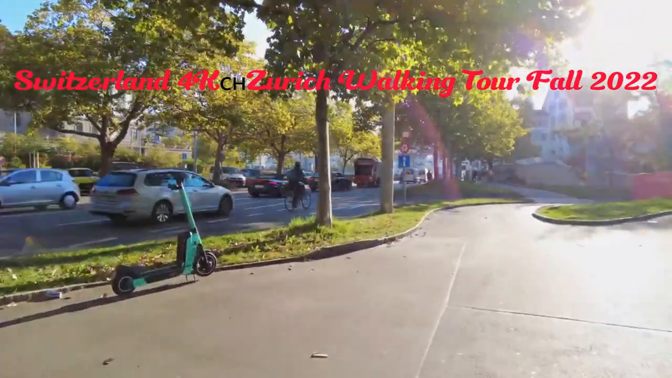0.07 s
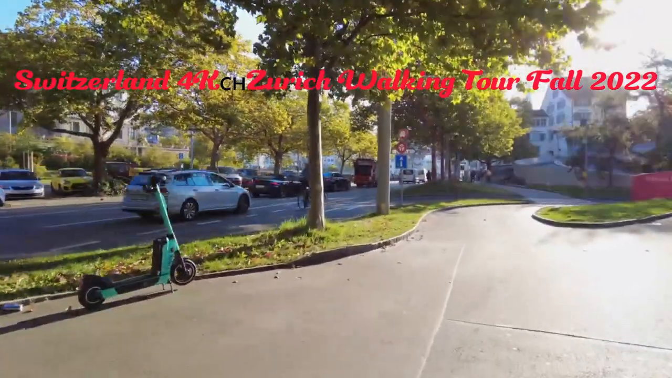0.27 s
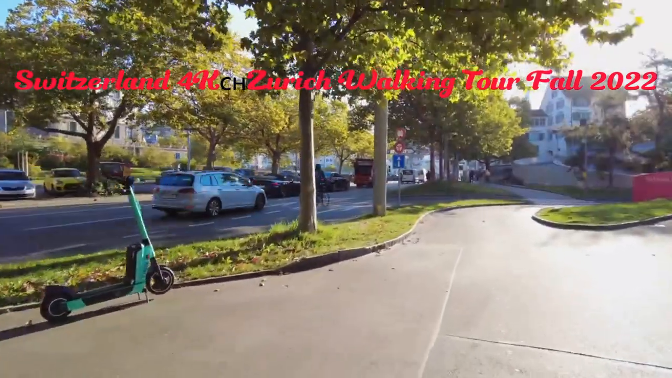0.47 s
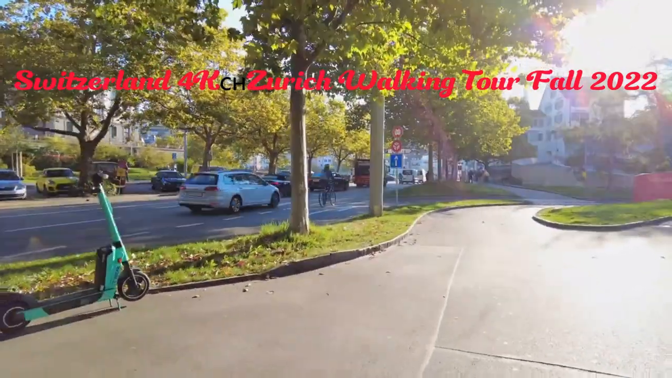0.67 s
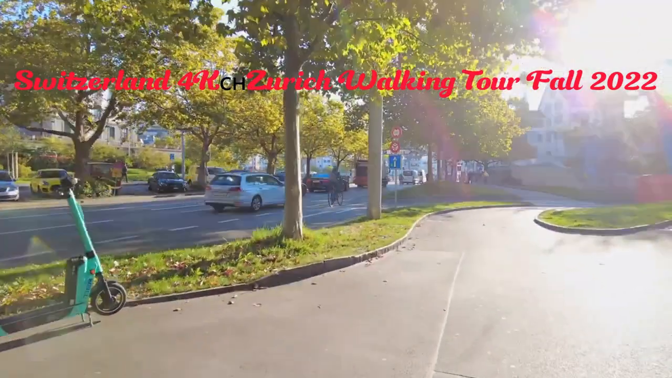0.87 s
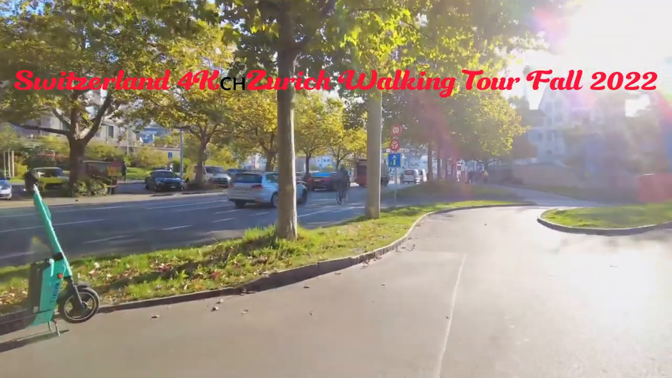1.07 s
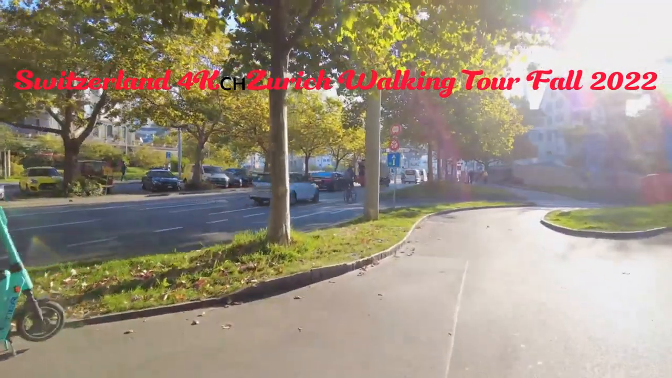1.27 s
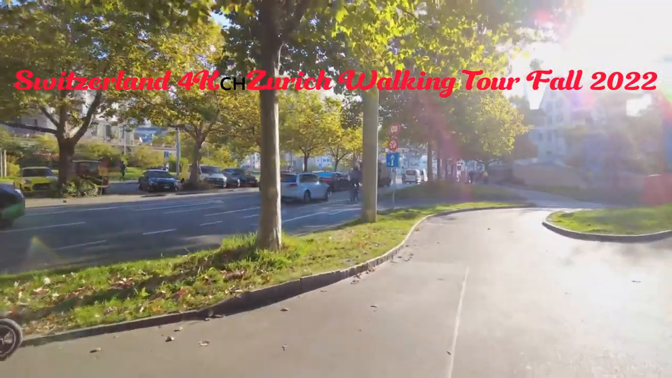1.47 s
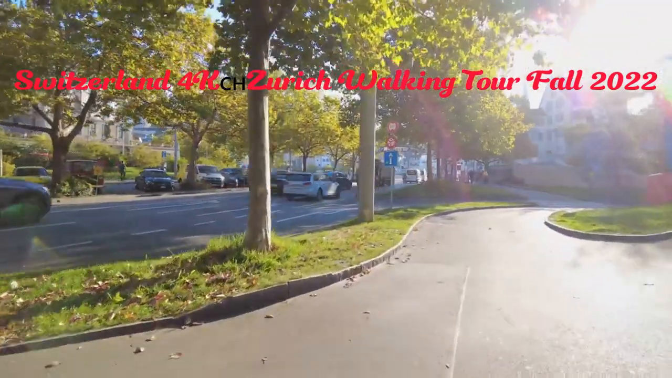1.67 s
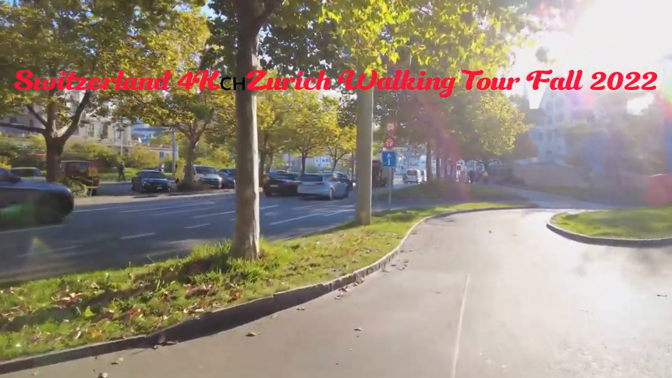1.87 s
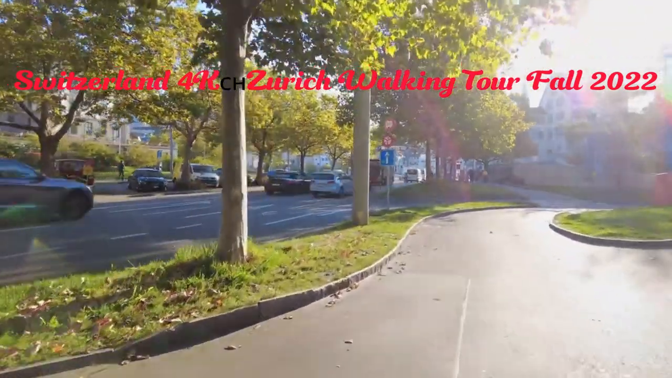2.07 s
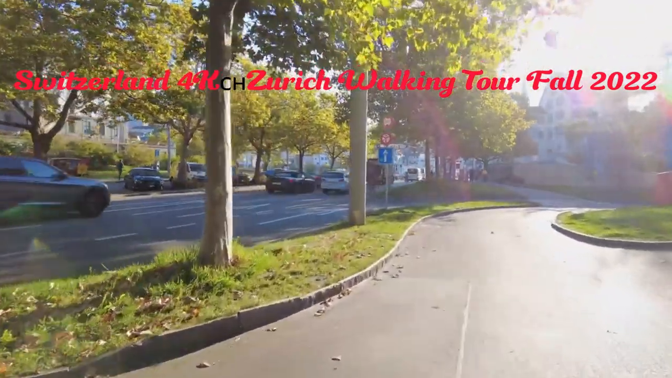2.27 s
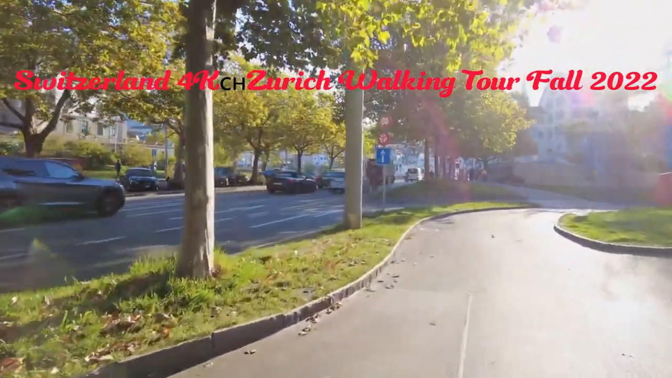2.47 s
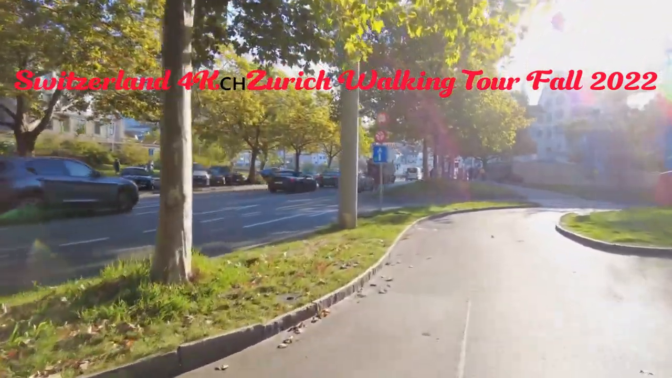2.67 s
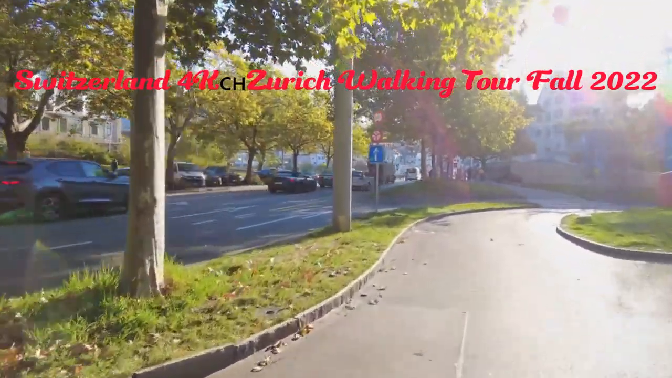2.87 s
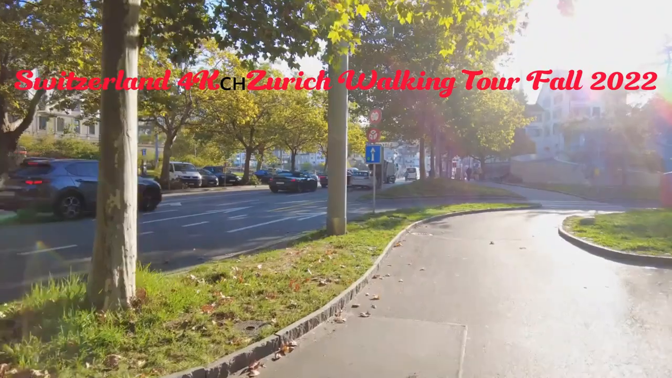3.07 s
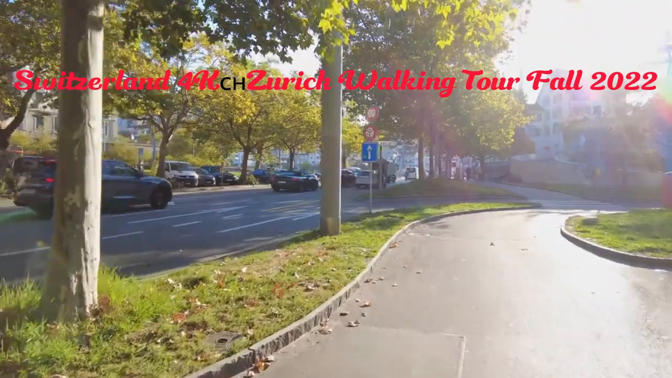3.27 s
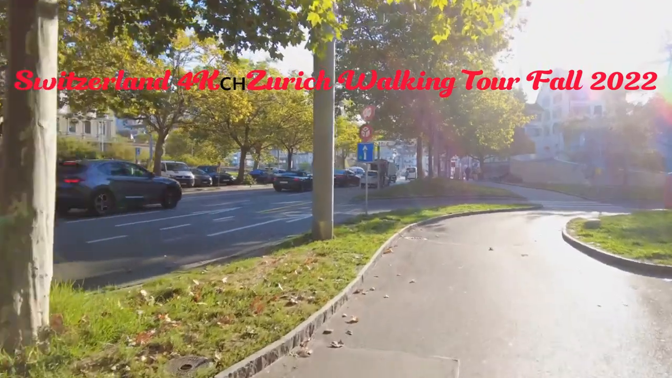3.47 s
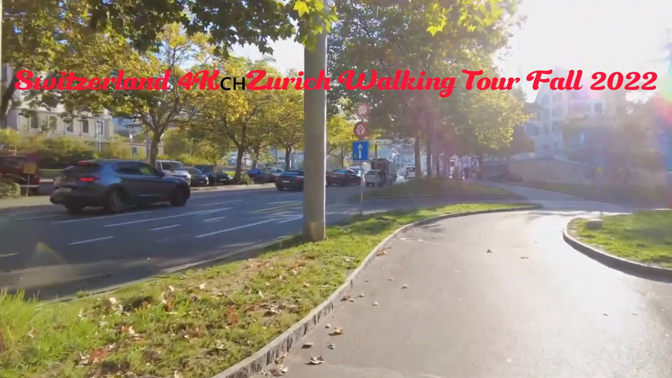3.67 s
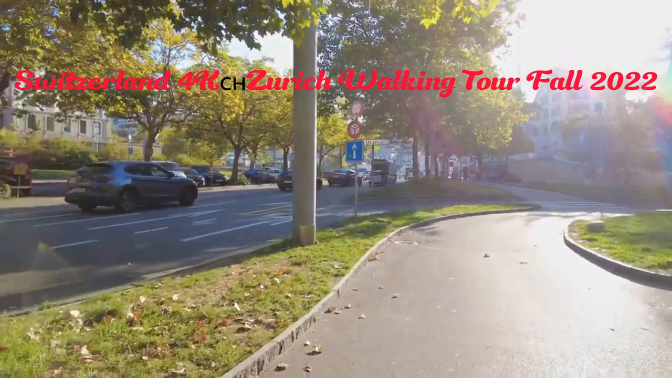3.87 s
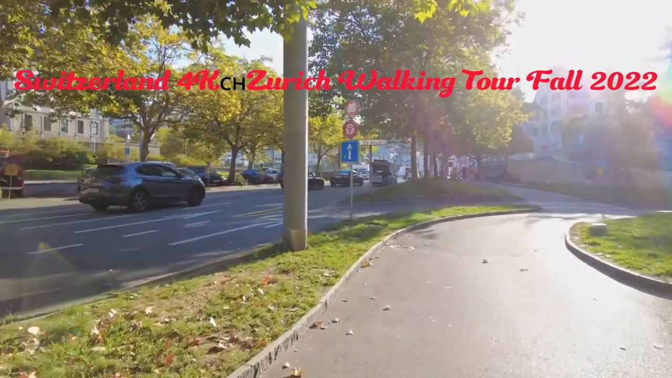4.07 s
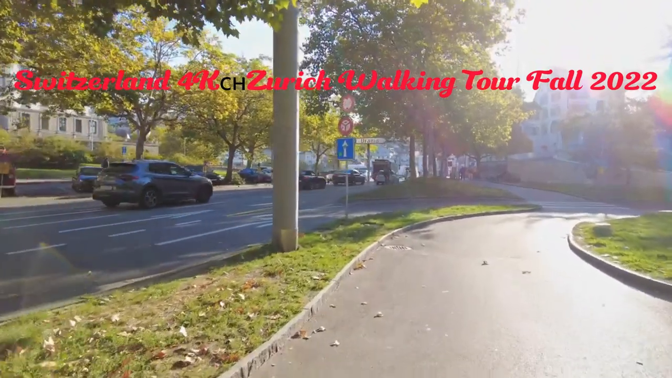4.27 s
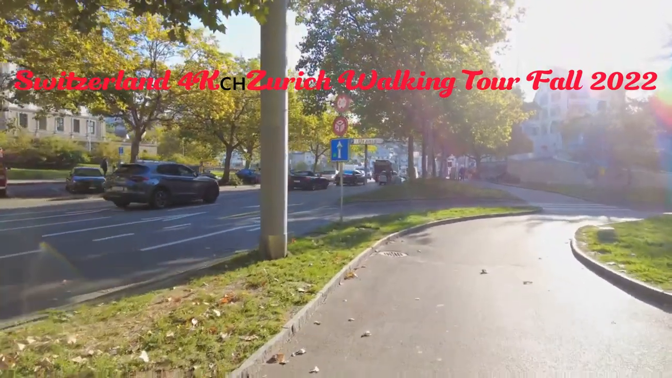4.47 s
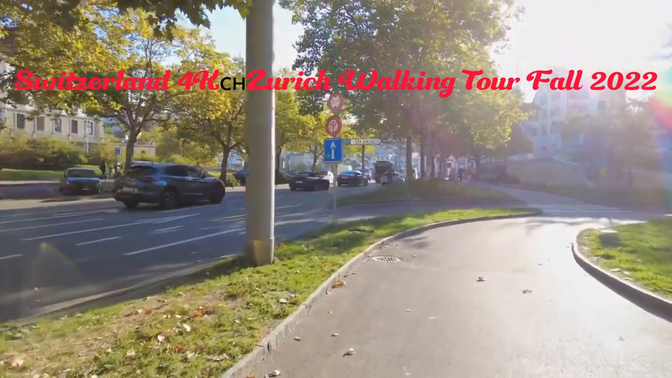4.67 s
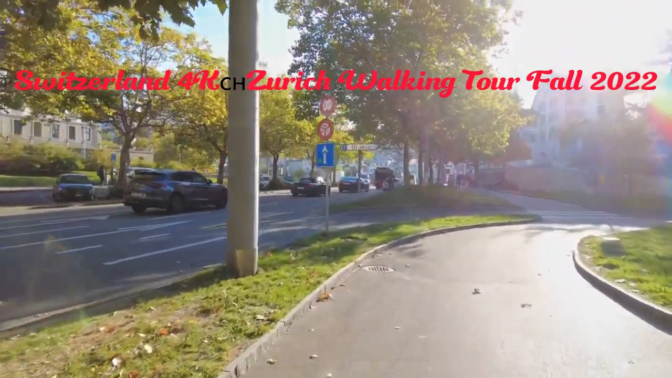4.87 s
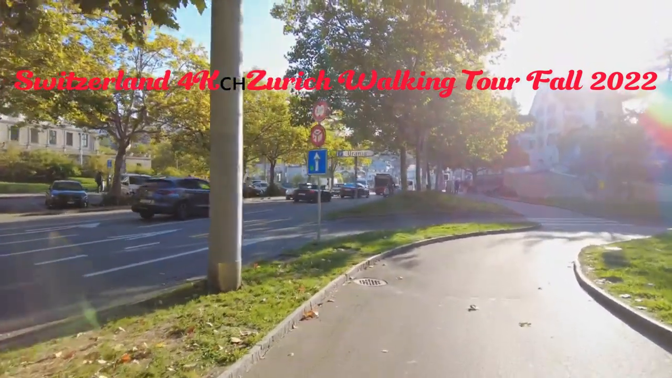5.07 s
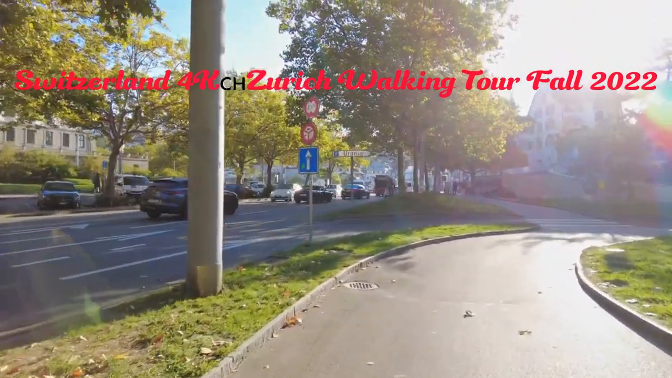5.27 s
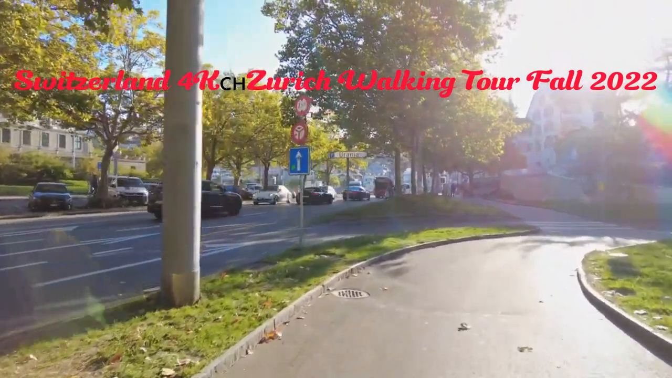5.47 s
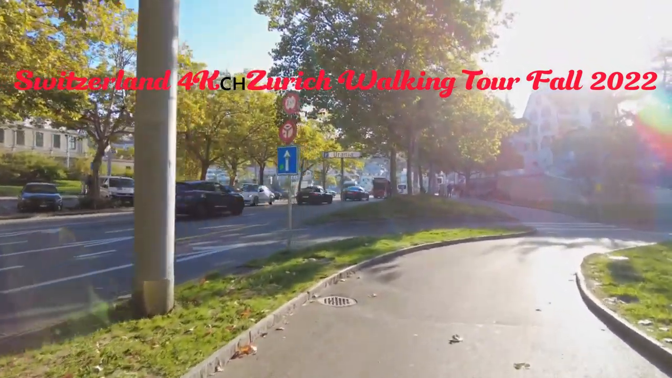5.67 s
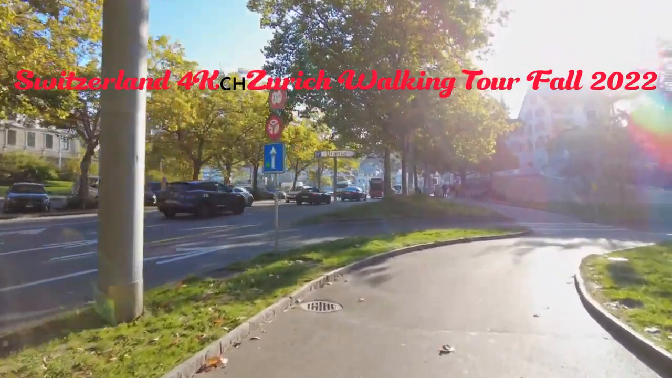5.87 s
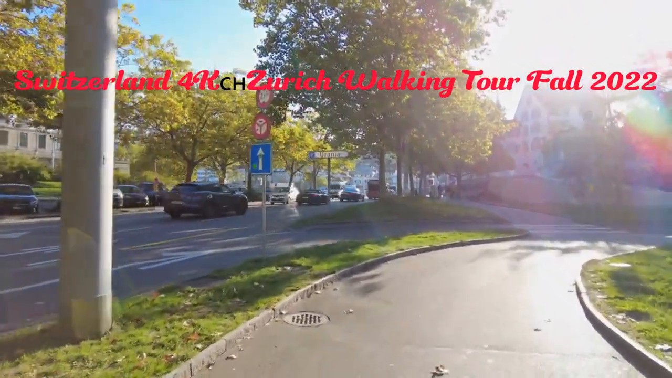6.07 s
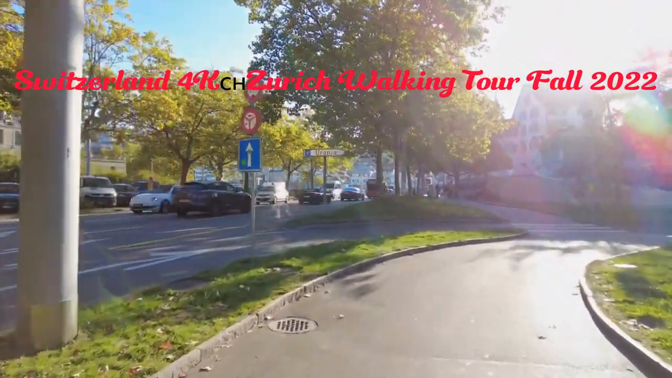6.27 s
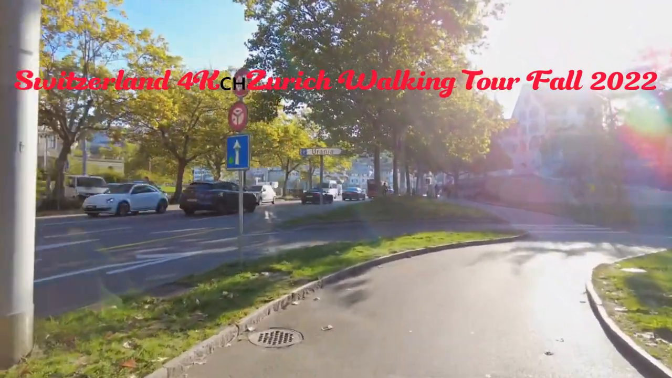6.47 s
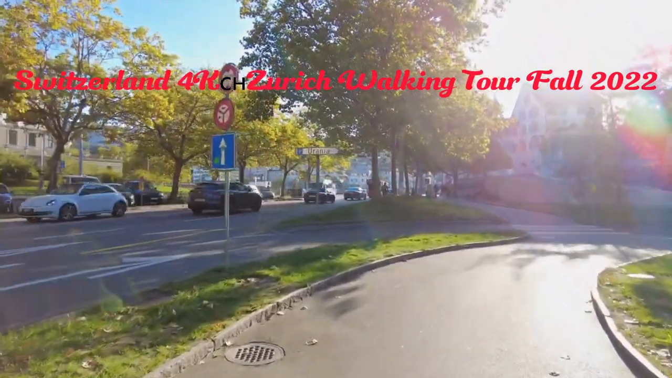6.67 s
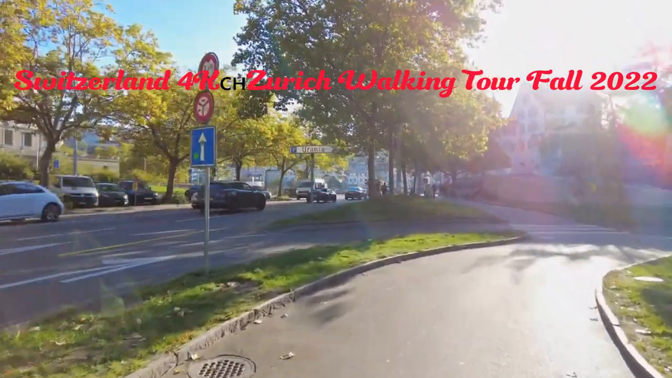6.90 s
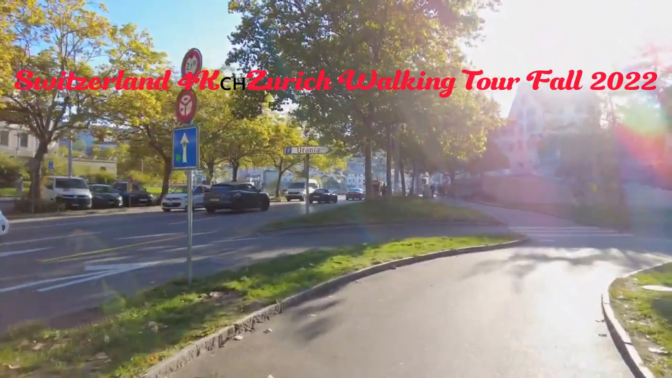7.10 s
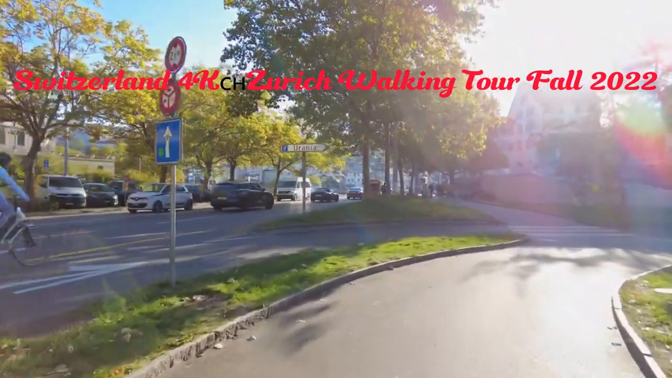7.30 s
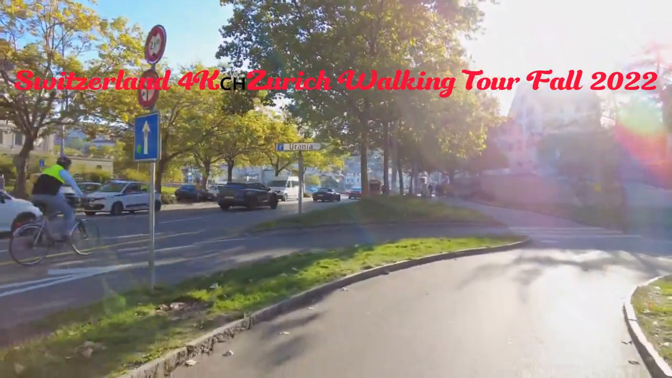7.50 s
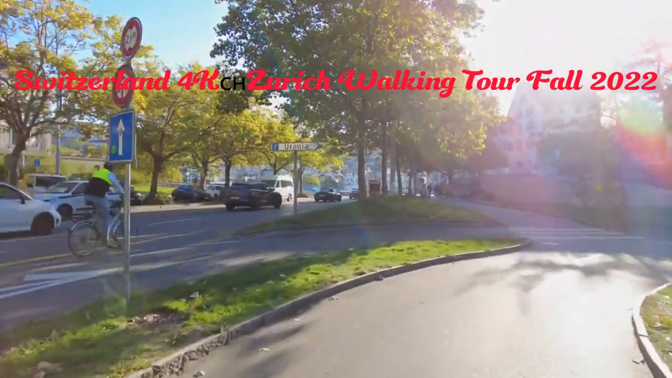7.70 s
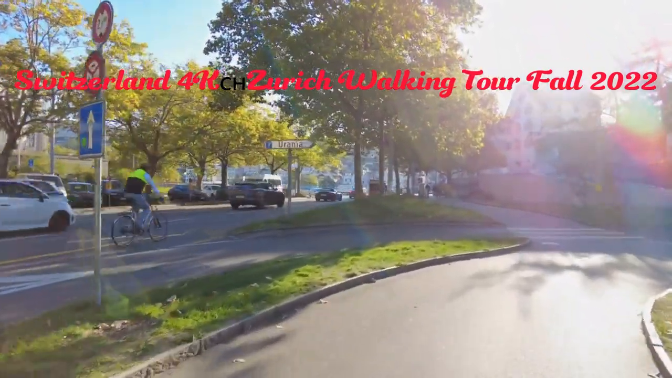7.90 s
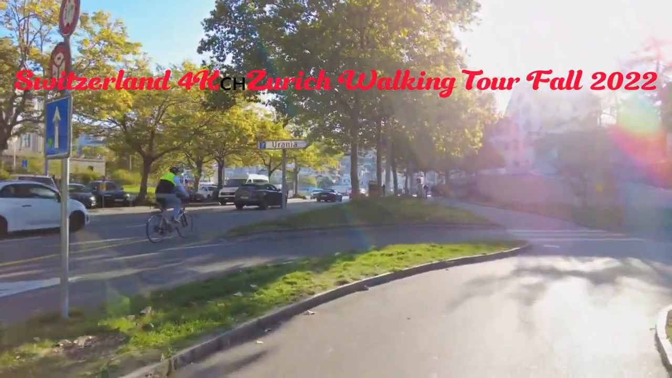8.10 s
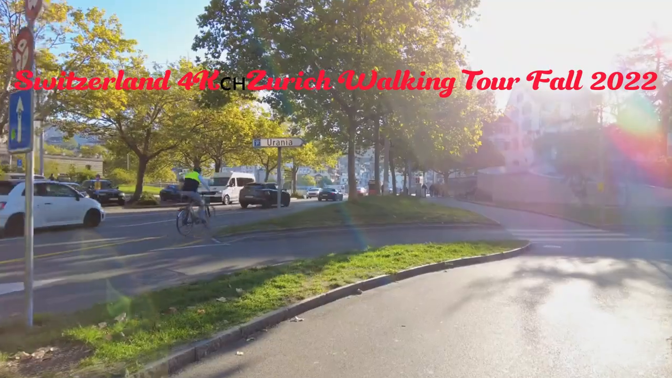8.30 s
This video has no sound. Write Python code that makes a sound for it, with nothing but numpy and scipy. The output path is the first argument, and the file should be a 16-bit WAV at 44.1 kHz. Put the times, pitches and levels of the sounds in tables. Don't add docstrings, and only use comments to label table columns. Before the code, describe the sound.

Outdoor stereo ambience on a tree-lined city street. Bass-heavy traffic rumble runs throughout, strongest in the first three seconds as close cars pass on the left, then easing before rougher tyre roar returns near the end. Dull booms mark wheels crossing road joints. Very quiet footsteps scuff grit and leaves below the microphone, about two per second, with tiny snaps.

```python
import sys
import numpy as np
from scipy import signal
from scipy.fft import rfft, irfft
from scipy.io import wavfile
from scipy.ndimage import uniform_filter1d

SR = 44100
rng = np.random.default_rng(int(sys.argv[2]) if len(sys.argv) > 2 else 0)


def amplitude_ratio(level_db):
    exponent = np.asarray(level_db, float) / 20
    return 10 ** exponent


def wrap_up_sound(samples):
    columns = np.atleast_2d(samples).T
    tamed = np.clip(columns, -1, 1)
    steps = np.round(tamed * 32767).astype(np.int16)
    wavfile.write(sys.argv[1], SR, steps)


N = 367794
CROSSOVER_HZ = 1205
LEFT_RIGHT = np.array([[1], [-1]])


def evened(x):
    return x / np.sqrt(np.mean(x ** 2) + 1e-20)


def read(points, hz):
    f, *columns = np.transpose(points)
    return np.array([np.interp(np.log(hz + 1), np.log(f + 1), c) for c in columns])


def add(mix, s, sound):
    part = mix[..., round(s * SR):][..., :sound.shape[-1]]
    part += sound[..., :part.shape[-1]]


def wander(count, hz):
    width = max(round(SR / hz), 1)
    return evened(uniform_filter1d(uniform_filter1d(rng.standard_normal(count), width), width))


def patchwork(bins, frames, wide, long):
    grain = rng.standard_normal((bins, frames))
    return evened(uniform_filter1d(uniform_filter1d(grain, wide, 0), long, 1))


def ports(hz):
    # (frequency [Hz], likeness [0-1], left leads [rad], left louder [dB])
    below = [(40, 1, 0.14, -2.5), (130, 0.95, 0.32, 0.5), (363, 0.88, 0.82, 0), (710, 0.65, 2.35, 2),
             (990, 1, 2.64, 1), (1220, 0.9, 3.65, 3)]
    above = [(1250, 0.95, 0.81, 1.1), (1480, 0.8, 0.25, .8), (2280, 0.61, 0.98, .6), (3220, 0.29, 1.04, .6),
             (3700, 0.065, 1.8, 1), (6500, 0.11, 0.11, .8), (9000, .1, -.3, .5), (10500, 0.15, 0, .8)]
    return np.where(hz < CROSSOVER_HZ, read(below, hz), read(above, hz))


def traffic(t, hz):
    # (closest [s], time to half power [s], close-by engine and hiss [dB], far tyre roar [dB])
    passes = [
        (.3, 0.79, 7, 4.5),
        (1.4, 0.78, 2.5, 2.5),
        (2.8, 1, 4.5, -2.5),
        (4.95, 0.16, -4, -1.5),
        (5.68, 0.3, -1, -2),
        (6.6, 0.19, -13, 6.5),
        (6.95, 0.15, -6.5, 0),
        (7.6, 0.33, -4.5, 7),
        (8.3, .3, -8, 5.5),
    ]
    # (frequency [Hz], on the close-by part [dB], on the tyre roar [dB])
    answer = [(120, -11, -30), (400, -1, -15), (900, -3, 4), (1500, -8, -1), (2800, -1, -5.5),
              (13000, -2.5, -3)]
    s, half, near_db, roar_db = np.transpose(passes)[:, :, None]
    closeness = 1 / (1 + ((t - s) / half) ** 2)
    near = (amplitude_ratio(2 * near_db) * closeness).sum(0)
    roar = (amplitude_ratio(2 * roar_db) * closeness).sum(0)
    centres, on_near_db, on_roar_db = np.transpose(answer)
    power = 1 + np.outer(amplitude_ratio(2 * on_near_db), near) + np.outer(amplitude_ratio(2 * on_roar_db), roar)
    level_db = 10 * np.log10(power)
    bands = read(np.c_[centres, np.eye(len(centres))], hz)
    return bands.T @ (level_db - level_db.mean(1, keepdims=True))


def road(patchy_db=0.64, scatter_rad=0.98, motors_db=1.5, airy_db=0.56, gust_db=1.13):
    # (frequency [Hz], density [dB per Hz])
    street = [(20, -12), (35, -1), (60, -6.5), (90, -12), (200, -16.5), (400, -29.5), (640, -30.5),
              (1500, -31.5), (2200, -39), (2800, -38), (3600, -46), (5500, -49.5), (9500, -62),
              (15500, -68.5)]
    # (time [s], focus: the ports' likeness is raised to 1 / focus, factor on the
    bearing = [(0, 1.3, 0.89), (1, 0.85, 0.86), (2, 1.2, 0.83), (3, 0.76, 0.93), (4.8, 1.2, 0.89),
               (5.6, 0.91, 0.93), (6.3, .9, 0.99), (7.3, 0.7, 1.02), (8.34, 0.78, 1.26)]
    # (frequency [Hz], width [Hz], level [dB])
    whine_rows = [(290, 35, 1.5), (332, 29, 3), (446.7, 19, 5), (576.4, 5.5, 4.5), (1738, 42, 3.5),
                  (2030, 81, 3.5), (4370, 170, 3.5)]
    # (middle [s], length [s],
    # frequency [Hz], width [Hz], level [dB])
    swell_rows = [(0.16, 0.46, 554, 30, 10), (5.14, 0.94, 296, 24, 5), (5.65, 0.71, 1370, 290, 4.5),
                  (6.58, 0.98, 328, 58, 4.5), (10, 0.37, 562, 25, 6), (8, 1.2, 330, 60, 3),
                  (8.0, 0.81, 540, 22, 5), (8.052, 0.67, 444, 19, 8), (5.35, 0.85, 850, 110, 4),
                  (4.7, .5, 950, 300, -1.5), (.6, .35, 400, 150, -2), (0.52, .35, 210, 80, -2),
                  (6.1, 0.24, 830, 300, 1), (1.2, 2.2, 6700, 2200, 2), (7.78, 1.5, 1420, 430, 1),
                  (1.25, 0.62, 570, 120, 5.5), (1.68, 0.27, 810, 77, 7), (5.2, 0.58, 1300, 500, 0),
                  (0.1, 0.27, 750, 340, 2.5), (6.9, 0.19, 930, 200, 4.5), (4.74, .6, 330, 53, -0.5),
                  (.15, .4, 350, 28, 5), (4.65, .4, 660, 250, 2.5), (5.5, 1.1, 1700, 450, 1),
                  (4.4, 1.2, 5500, 4000, 1), (1.0, 1.2, 8100, 3000, 0.5), (2.2, 0.83, 183, 25, 3.5),
                  (4.98, .35, 283, 25, 3.5), (2.6, .4, 285, 25, 3), (7.35, .35, 285, 25, 2),
                  (3.0, .9, 545, 30, 3.5)]
    frames, hz = N // 512 + 6, np.fft.rfftfreq(2048, 1 / SR)
    t, bins, column = np.arange(frames) * 512 / SR, len(hz), hz[:, None]

    streaks = patchwork(bins, frames, 3, 7)
    streaks *= motors_db / (1 + (np.log2(column / 550 + 1e-3) / .8) ** 4)
    patches = (patchy_db + airy_db * column / 12000) * patchwork(bins, frames, 16, 10)
    gusts = gust_db * evened(uniform_filter1d(rng.standard_normal(frames), 4)) * np.clip(column / 8000, 0, 1)
    whines = sum(db / (1 + (2 * (column - f) / width) ** 2) for f, width, db in whine_rows)
    swells = sum(db * np.exp(-(2 * (t - s) / length) ** 4) / (1 + (2 * (column - f) / width) ** 2)
                for s, length, f, width, db in swell_rows)

    scatter = scatter_rad * patchwork(bins, frames, 3, 7)
    scatter *= np.where(column < CROSSOVER_HZ, column / CROSSOVER_HZ, 0)
    same, lead, left_db = ports(hz)[:, :, None]
    s, *factors = np.transpose(bearing)
    focus, turn = (np.interp(t, s, v) for v in factors)
    same = np.clip(same ** (1 / focus), 0, 1)
    lead = lead * turn + scatter
    a, b, c, d = rng.standard_normal((4, bins, frames))
    left = a + 1j * b
    right = (same * left + np.sqrt(1 - same ** 2) * (c + 1j * d)) * np.exp(-1j * lead)
    z = np.array([left * amplitude_ratio(left_db / 2), right * amplitude_ratio(-left_db / 2)])
    z *= amplitude_ratio(read(street, hz).T + whines + swells + streaks + traffic(t, hz) + patches + gusts)
    return amplitude_ratio(-29) * evened(signal.istft(z, nperseg=2048, noverlap=1536)[1][:, :N])


def hiss(level_db=-76.5, shared_power=.6, low_hz=7000):
    shared, *own = rng.standard_normal((3, N))
    noise = np.sqrt(shared_power) * shared + np.sqrt(1 - shared_power) * np.array(own)
    return amplitude_ratio(level_db) * evened(signal.lfilter(*signal.butter(N=2, Wn=low_hz, btype="high", fs=SR), noise))


def engine(rows, extra=(), rings=(), waver=0.0019, flutter_db=0.7):
    s, hz, level_db = np.transpose(rows)
    t = np.arange(s[0], s[-1], 1 / SR)
    turns = np.cumsum(np.interp(t, s, hz) * (1 + waver * wander(len(t), 10.4))) / SR
    firing = amplitude_ratio(np.interp(t, s, level_db))
    orders = [(1, firing)] + [(order, firing * amplitude_ratio(db)) for order, db in extra]
    for order, middle, length, db in rings:
        orders.append((order, amplitude_ratio(db) * np.exp(-(2 * (t - middle) / length) ** 2)))
    out = np.zeros((2, len(t)))
    for order, size in orders:
        same, lead, left_db = ports(order * hz.mean())
        height = np.sqrt(2) * size * amplitude_ratio(flutter_db * wander(len(t), 5.7))
        angle = 2 * np.pi * (order * turns + rng.random() * (s[0] > 0))
        out += height * amplitude_ratio(left_db / 2 * LEFT_RIGHT) * np.cos(angle + lead / 2 * LEFT_RIGHT)
    fade = np.clip(np.minimum(t - s[0] + (s[0] == 0), s[-1] - t) / 0.022, 0, 1)
    return s[0], out * fade


def near_engines(mix):
    # (time [s], firing line [Hz], level [dB])
    leaving = [(0.0, 47.4, -30), (0.12, 47.6, -32), (0.25, 46.3, -24), (0.38, 49.2, -40),
               (0.5, 47.5, -16.5)]
    coasting = [(.35, 55.87, -34), (.65, 54.86, -24), (1.0, 54.25, -23.5), (1.14, 53.47, -33),
                (1.28, 53.05, -24), (1.42, 52, -28), (1.66, 51.23, -16), (1.86, 49.67, -19),
                (1.97, 50.03, -15), (2.3, 48.66, -20), (2.52, 48.5, -17.5), (2.68, 47.95, -16),
                (2.9, 46.65, -23.5), (3.1, 45.6, -21)]
    braking = [(3.1, 45.84, -17), (3.42, 42.82, -24.5), (3.58, 42.33, -21), (3.95, 39.36, -21),
               (4.2, 36.8, -40)]
    following = [(1.5, 64.8, -43), (1.75, 65.8, -42), (2.5, 66, -31.5), (2.9, 64, -43.5)]
    pipe = [(2.7, 198, -62), (2.91, 191.6, -39), (3.54, 190.2, -40), (3.75, 189, -66)]
    pulling = [(2.9, 50.5, -54), (3.04, 56.54, -21.5), (3.2, 68.5, -28.5), (3.36, 69.97, -30),
               (3.6, 70, -26), (3.75, 70.4, -30), (3.9, 69.86, -25.5), (4.18, 70.55, -27),
               (4.32, 68.1, -36), (4.6, 62.6, -28.5)]
    exhaust = [(4.8, 178, -54), (5.05, 179, -41), (5.27, 180.6, -49), (5.48, 181.3, -49), (5.7, 180.9, -39),
               (6.15, 181.3, -38.5), (6.4, 181.5, -41), (6.62, 181.8, -38), (7.07, 182.3, -41.5),
               (7.3, 177, -73)]
    speeding = [(5.15, 67.8, -36), (5.34, 71.74, -33), (5.92, 80.24, -31), (6.11, 83, -45), (6.31, 87, -32),
                (6.5, 90.1, -60)]
    arriving = [(7.3, 43.8, -50), (7.5, 45.35, -18.5), (7.61, 46.7, -35), (7.73, 49.2, -21.5),
                (7.89, 49.83, -26), (8.07, 48.97, -14.5), (8.17, 48.7, -19), (8.34, 49.16, -53)]
    # (multiple of its loudest line, level under it [dB])
    leaving_orders = [(1.92, -13)]
    following_orders = [(2, -8.5)]
    pipe_orders = [(.5, -1)]
    exhaust_orders = [(.8, -12), (1.6, -13), (3.0, -18), (3.4, -23), (3.6, -22), (4.0, -23), (4.4, -23)]
    # (multiple,
    # middle [s], length [s], level [dB])
    slowing_rings = [(2, 0.84, 0.64, -33.5), (2, 1.377, 0.39, -40.5), (2, 1.95, 0.3, -33.5),
                     (2, 2.41, 0.35, -33.5), (2, 3.05, 0.25, -35), (1.33, 0.77, 0.64, -39),
                     (3.85, 0.48, 0.7, -43), (4, 2.3, 0.39, -43), (4, 2.95, 0.35, -40),
                     (2, 3.78, 0.52, -36), (4, 3.28, 0.42, -40.5), (4, 3.73, 0.57, -41)]
    pulling_rings = [(2, 3.64, 0.45, -40.5), (2, 4.42, .2, -37)]
    exhaust_rings = [(.8, 5.25, 0.46, -39.5), (.8, 6.5, 0.19, -40), (.8, 6.6, .3, -40), (.2, 5.73, .7, -35),
                     (0.24, 6.38, 0.75, -35.5)]
    speeding_rings = [(2, 5.72, .45, -39)]
    arriving_rings = [(2, 7.47, 0.42, -38), (2, 7.8, 0.24, -33), (2, 8.15, 0.6, -34.5),
                      (4, 7.55, 0.32, -41.5), (4, 7.85, 0.4, -42), (4, 8.25, 0.43, -40)]
    add(mix, *engine(leaving, leaving_orders))
    add(mix, *engine(coasting + braking[1:], rings=slowing_rings))
    add(mix, *engine(following, following_orders))
    add(mix, *engine(pipe, pipe_orders))
    add(mix, *engine(pulling, rings=pulling_rings))
    add(mix, *engine(exhaust, exhaust_orders, exhaust_rings, waver=0.0018))
    add(mix, *engine(speeding, rings=speeding_rings))
    add(mix, *engine(arriving, rings=arriving_rings))


def faint_engines(mix):
    # (time [s], line [Hz], level [dB])
    idling = [(0.0, 37.4, -26), (.3, 37.7, -27.5), (.45, 37.86, -51), (.6, 38.22, -26.5), (1.02, 40, -25),
              (1.2, 39.18, -49)]
    climbing = [(.55, 151.5, -40), (.85, 159.5, -45), (1.1, 167.7, -36.5), (1.35, 170, -44),
                (1.75, 176.2, -38.5)]
    climbing_high = [(.72, 178.3, -40), (.95, 184, -38), (1.13, 188, -46), (1.45, 197.4, -39),
                     (1.7, 201, -54)]
    truck = [(4.2, 27.2, -38), (4.5, 25.8, -33.5), (4.75, 26.7, -28)]
    cruising = [(4.3, 50.13, -28.5), (4.82, 46.38, -30.5), (5.0, 46.05, -28.5), (5.5, 48.84, -30),
                (5.7, 49.94, -33.5), (5.88, 51.23, -25), (6.3, 51.57, -33), (6.75, 50.33, -28.5),
                (7.15, 47.6, -39)]
    waiting = [(5.801, 74.7, -31), (6.02, 72.9, -30.5), (6.67, 72.1, -34), (6.88, 71.5, -39),
               (7.1, 71.5, -32)]
    queuing = [(6.199, 35.9, -47), (6.85, 32.84, -32.5), (7.2, 36.1, -37.5)]
    starting = [(7.0, 114.2, -51), (7.2, 119.2, -39), (7.35, 124, -38.5), (7.5, 134.7, -39),
                (7.68, 139, -42)]
    # (time [s], line [Hz], level [dB])
    gears = [
        [(3.9, 356.2, -59), (4.15, 352.5, -51), (4.45, 347, -51.5), (4.75, 342.5, -58)],
        [(7.65, 550, -62), (7.85, 547, -54), (8.15, 541, -57), (8.34, 537.6, -58)],
        [(7.65, 457, -60), (7.85, 452, -53), (8.1, 444, -52), (8.34, 441, -54)],
        [(2.85, 186.5, -48), (3.05, 182, -40.5), (3.35, 176.2, -41), (3.55, 172.2, -52)],
    ]
    for rows in (idling, climbing, climbing_high, truck, cruising, waiting, queuing, starting, *gears):
        add(mix, *engine(rows))


def tick(db, hz, ring_ms):
    t, ring = np.arange(600) / SR, ring_ms / 1000
    return amplitude_ratio(db) * np.sin(2 * np.pi * hz * t) * t / ring * np.exp(1 - t / ring)


def grit_ticks(mix):
    # (time [s], peak [dB], frequency [Hz], ring [ms])
    snaps = [(1.3225, -46, 5800, .3), (1.6976, -56, 12000, .1), (1.9376, -57, 11200, .3),
             (1.9400, -42, 4504, .15), (1.9425, -48, 6500, .4), (1.9445, -49, 6800, .3),
             (1.9475, -46, 6200, .4), (1.9590, -45, 6000, .3), (2.3776, -43, 7540, .09),
             (2.4369, -52, 6500, .12), (4.2630, -54, 11500, .1), (4.4727, -42, 9500, .05),
             (4.5980, -49, 5620, .3), (4.9795, -46, 5800, .15), (5.5000, -56, 11500, .12),
             (5.5098, -46, 5940, .07), (5.5148, -49, 6600, 0.52), (5.6180, -50, 6600, .3),
             (6.0186, -48, 6000, .2), (6.1788, -58, 11300, 0.31), (6.6332, -51, 6800, .4),
             (6.6846, -57, 9100, .2), (7.3140, -55, 9400, .6), (7.4045, -55, 9330, .6),
             (7.8960, -46, 7490, .12), (7.9000, -47, 7600, .4), (7.9040, -51, 8500, 0.33),
             (7.9200, -52, 8800, .25), (8.0985, -45, 6500, 0.54), (.1243, -57, 13000, .12),
             (.3058, -52, 9500, .15), (1.2583, -56, 13000, .12), (1.9428, -56, 13000, .15),
             (1.963, -55, 13000, .15), (1.9699, -56, 13000, .15), (5.5095, -58, 13000, .1),
             (7.5737, -53, 9000, .2), (7.8961, -51, 10500, .1), (7.914, -54, 9000, .2),
             (8.0779, -56, 13000, .12), (8.183, -57, 13000, .12)]
    for s, *row in snaps:
        add(mix, s, tick(*row))


def bump(db, hz, upper, high_hz=145, rise=0.02, fall=0.11):
    t = np.arange(round(.4 * SR)) / SR
    shape = (1 - np.exp(-t / rise)) * np.exp(-t / fall)
    boom = np.sin(2 * np.pi * hz * t) + upper * np.sin(2 * np.pi * high_hz * t)
    return amplitude_ratio(db) * shape / shape.max() * boom / 1.5


def road_joints(mix):
    # (time [s], peak [dB], frequency [Hz], share of the upper boom)
    joints = [
        (0.149, -31, 112, 0.69),
        (2.05, -30, 131.6, 0.95),
        (2.448, -36, 113.1, 0.45),
        (3.049, -25.5, 118.8, 0.71),
        (3.718, -25.5, 124.7, 0.77),
        (4.33, -25, 120.6, 0.97),
        (5.248, -29.5, 111, 0.96),
        (6.495, -29, 131.1, 0.85),
    ]
    for s, *row in joints:
        add(mix, s, bump(*row))


def footfall(db, left_db, tilt_db, settle_s=.022, grains_per_s=4000, gritty_db=2.5, low_hz=4500):
    t, hz = np.arange(8192) / SR, np.fft.rfftfreq(8192, 1 / SR)
    noise, pick, size = rng.standard_normal((3, 8192)), rng.random(8192), rng.exponential(1, 8192)
    crackle = (pick < grains_per_s / SR) * amplitude_ratio(gritty_db * np.minimum(size, 4)) * np.sign(noise[2])
    colour = amplitude_ratio(tilt_db * np.log2(hz / 8000 + 1e-3)) * hz ** 4 / (hz ** 4 + low_hz ** 4)
    colour *= amplitude_ratio(1.5 * np.interp(hz, np.linspace(0, SR / 2, 16), rng.standard_normal(16)))
    grit = irfft(rfft(3.0 * noise[:2] + evened(crackle)) * colour)
    shape = np.where(t < .03, np.exp((t - .03) / (.5 * settle_s)), np.exp((.03 - t) / settle_s))
    return amplitude_ratio(db - 10.0 + left_db / 2 * LEFT_RIGHT) * evened(grit) * shape


def footsteps(mix):
    # (time [s], peak [dB], left louder [dB], brightness [dB per octave])
    steps = [(.29, -47, 5, -9), (.38, -49, 4, -7), (.49, -48, 2, -8), (.8994, -48, 3, -7),
             (.975, -51, 2, -7), (1.23, -51, 2, -7), (1.3252, -51, 6, -5), (1.63, -52, 5, -8),
             (1.84, -52, 2, -7), (1.938, -41, 2, -12), (1.9594, -42, 2, -9), (2.375, -49, 3, -8),
             (2.501, -56, 4, -5), (2.861, -47, 0, -12), (2.892, -43, 5, -15), (3.415, -47, .5, -10),
             (3.555, -49, 7, -7), (3.9409, -51, 5, -8), (4.234, -58, 4, -4), (4.469, -53, 3, -8),
             (4.4894, -60, .5, -3), (4.9594, -57, 5, -5), (4.9794, -47, 0, -12), (5.507, -47, 3, -9),
             (6.02, -49, 3, -7), (6.541, -46, 3, -12), (6.632, -45, 1, -17), (7.027, -47, 0, -12),
             (7.563, -47, 5, -10), (7.9, -45, 2, -12), (8.07, -48, 2, -6)]
    for s, *row in steps:
        add(mix, s - .027, footfall(*row))


def scene():
    mix = road() + hiss()
    near_engines(mix)
    faint_engines(mix)
    grit_ticks(mix)
    road_joints(mix)
    footsteps(mix)
    return mix


def low_pass(x):
    return signal.sosfilt(signal.butter(12, 15720, fs=SR, output="sos"), x)


def record(dry):
    return low_pass(dry)


dry = scene()
out = record(dry)
wrap_up_sound(out)
```